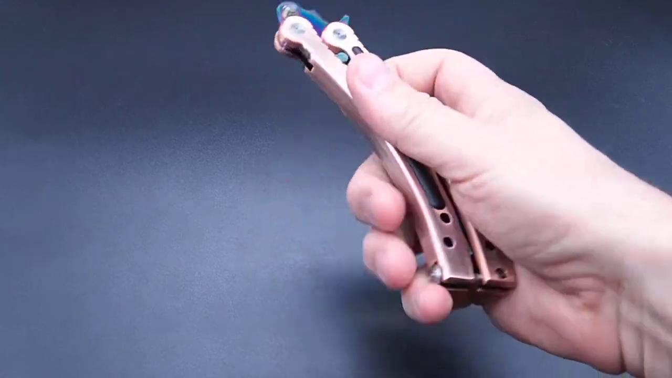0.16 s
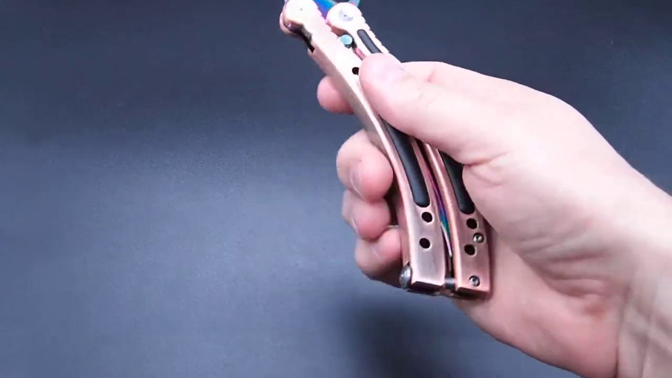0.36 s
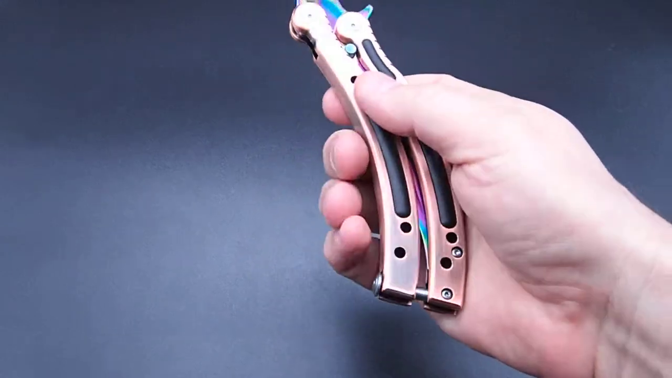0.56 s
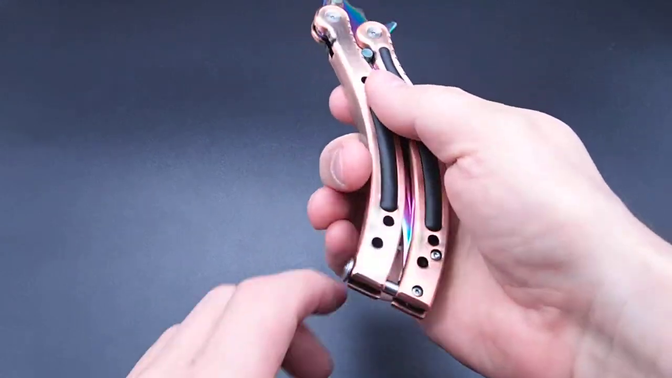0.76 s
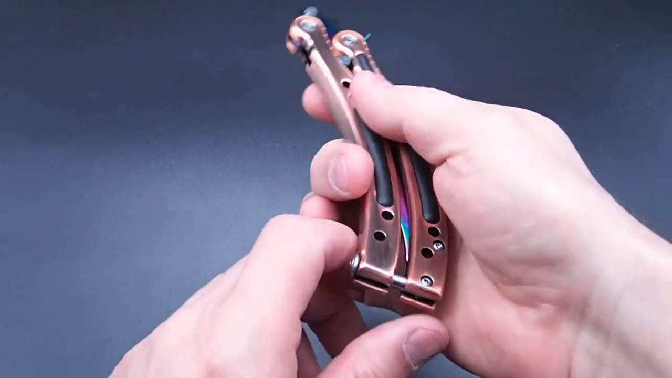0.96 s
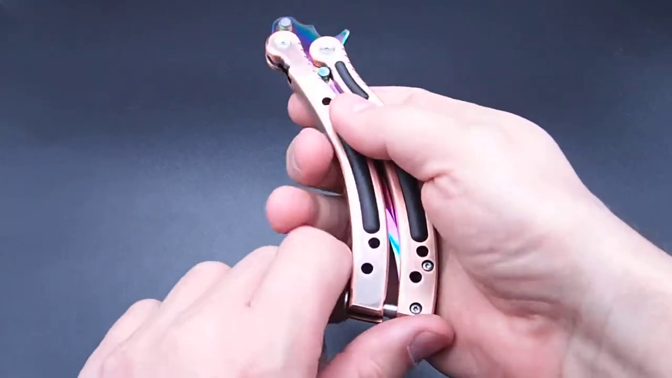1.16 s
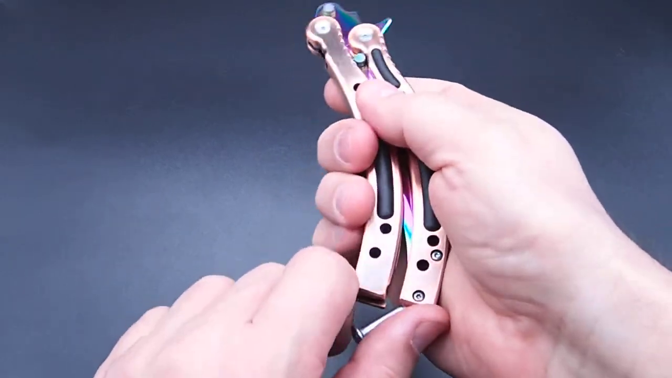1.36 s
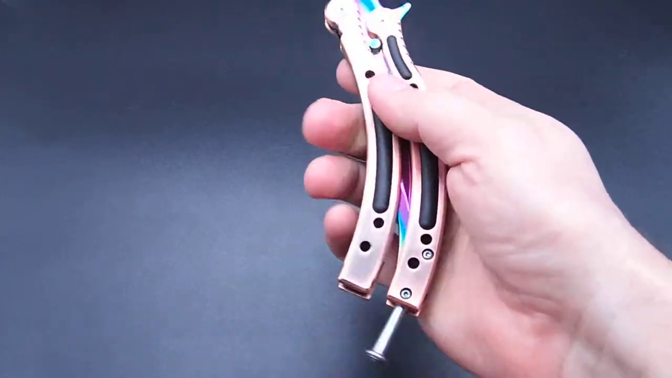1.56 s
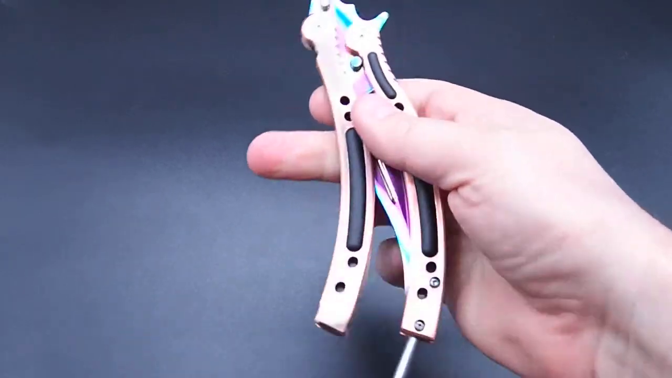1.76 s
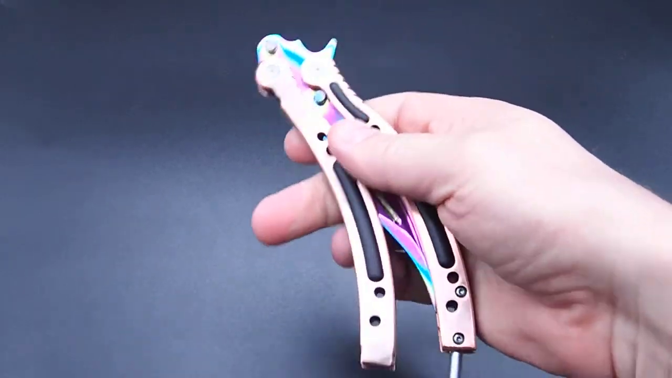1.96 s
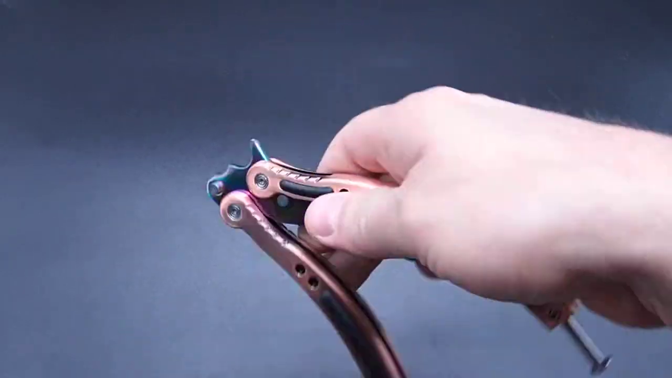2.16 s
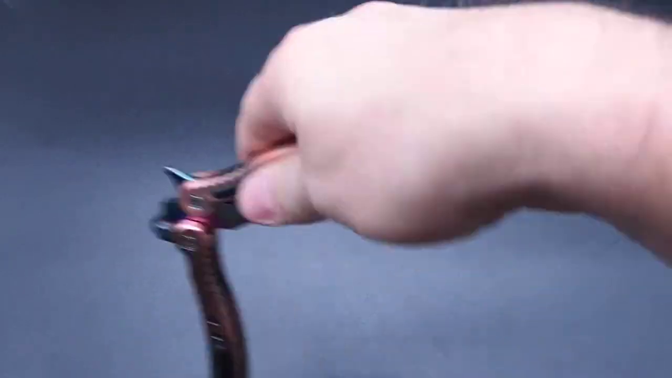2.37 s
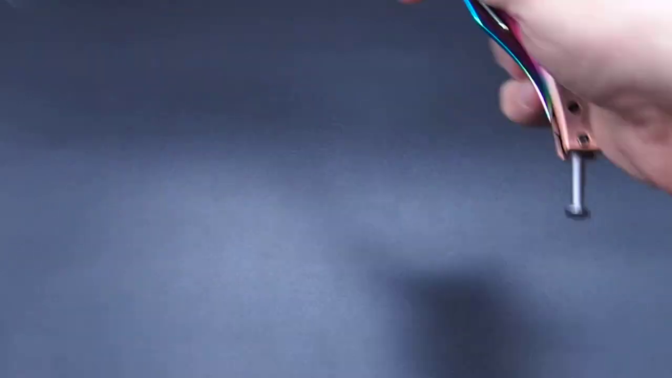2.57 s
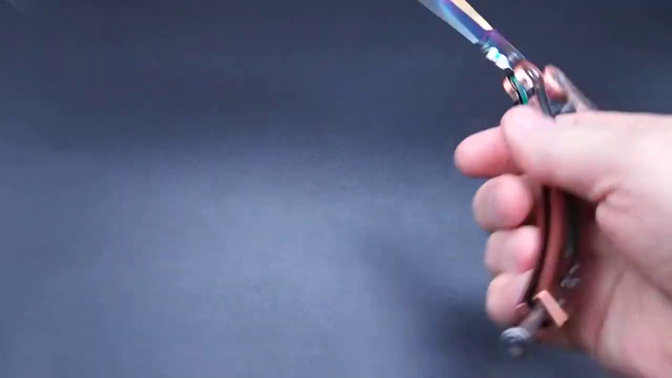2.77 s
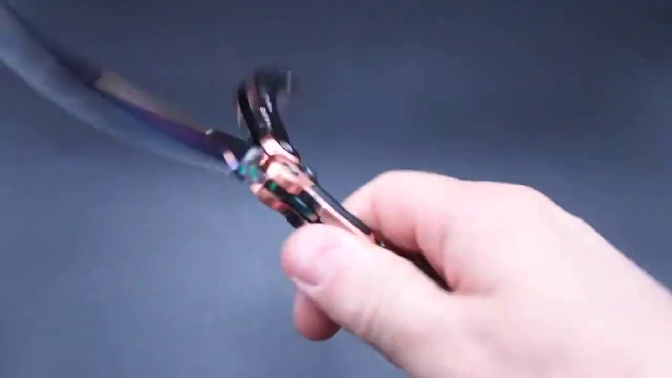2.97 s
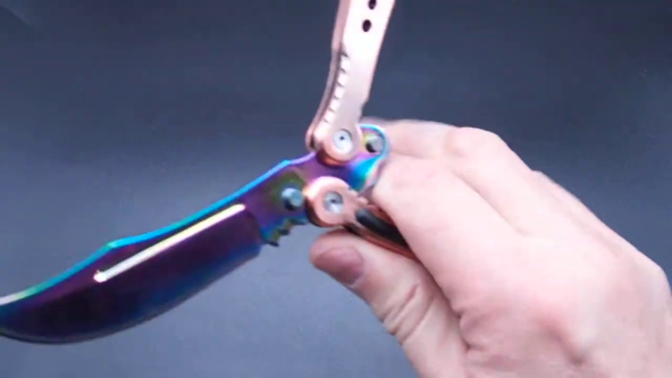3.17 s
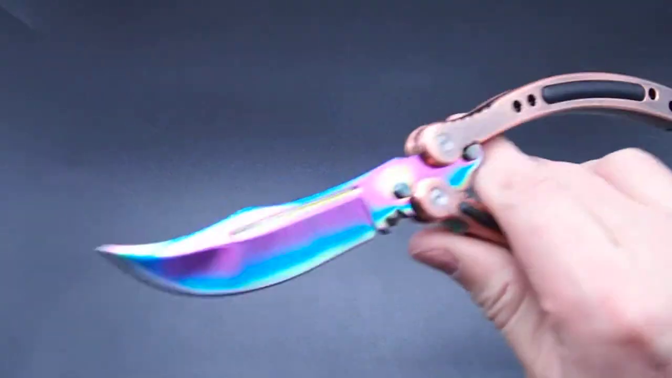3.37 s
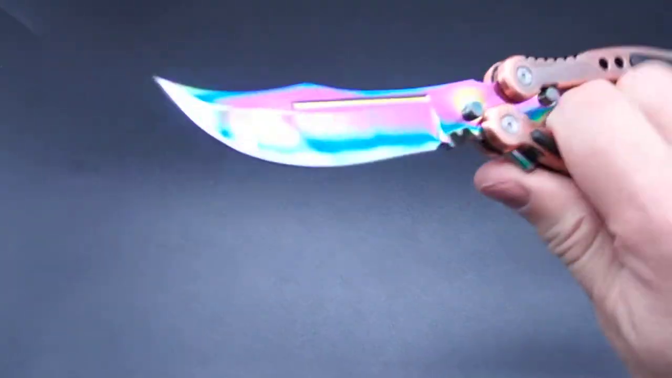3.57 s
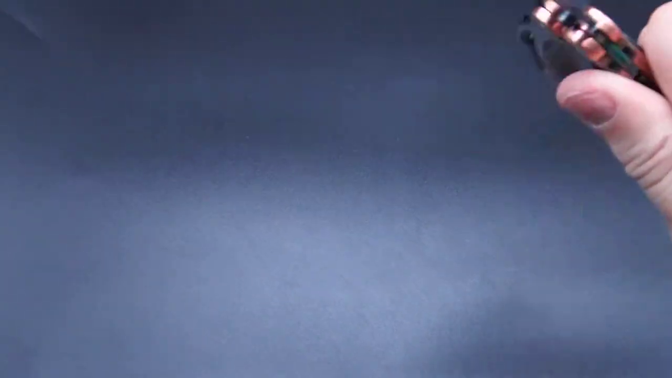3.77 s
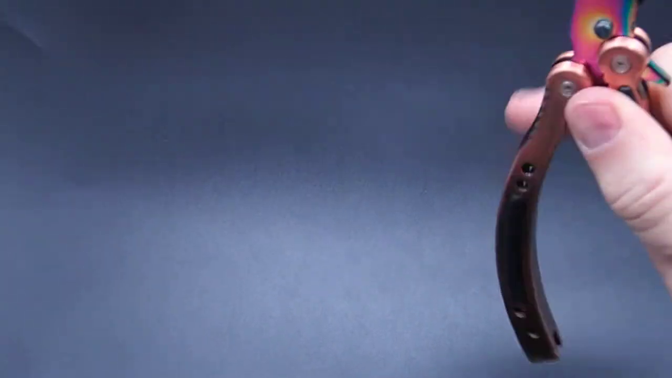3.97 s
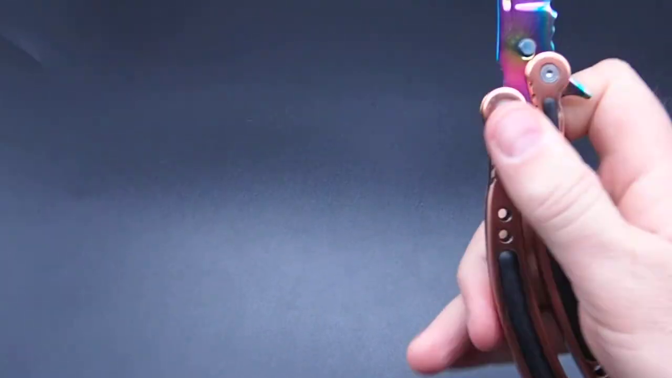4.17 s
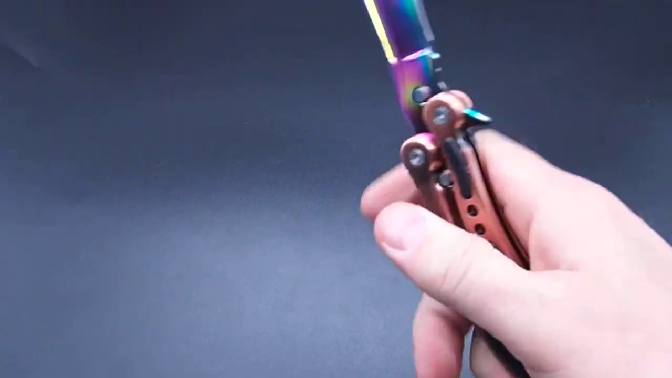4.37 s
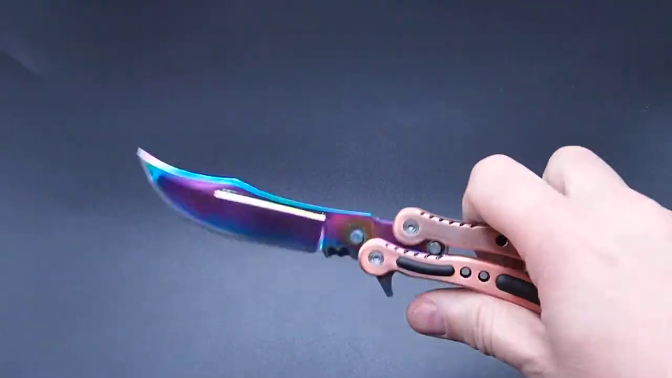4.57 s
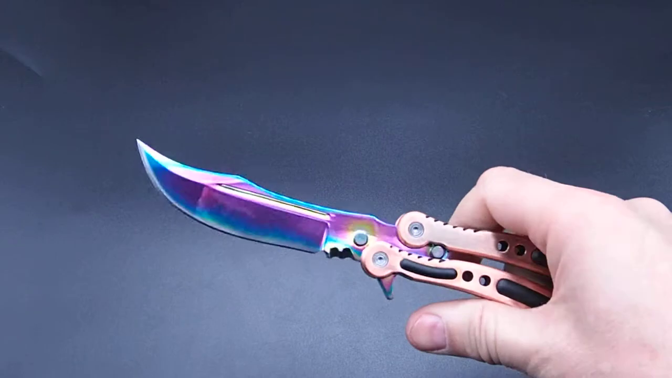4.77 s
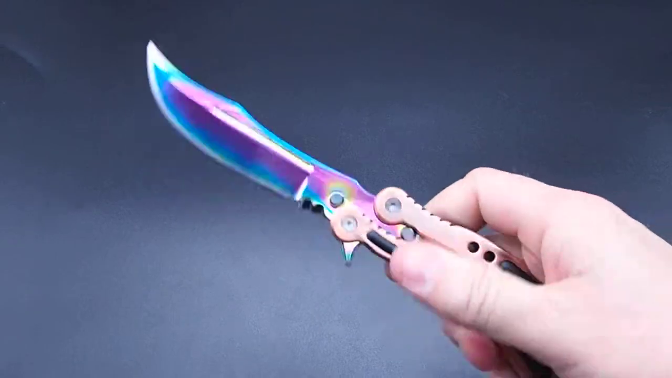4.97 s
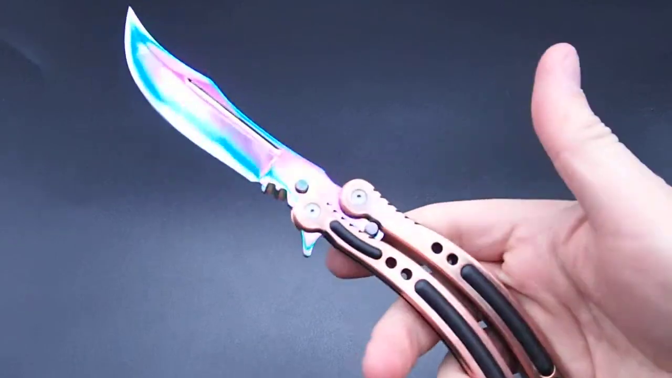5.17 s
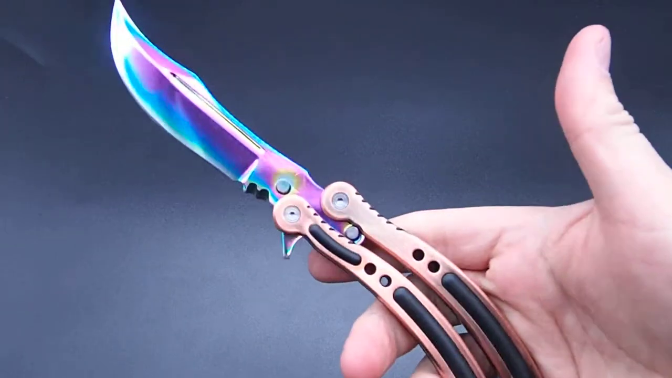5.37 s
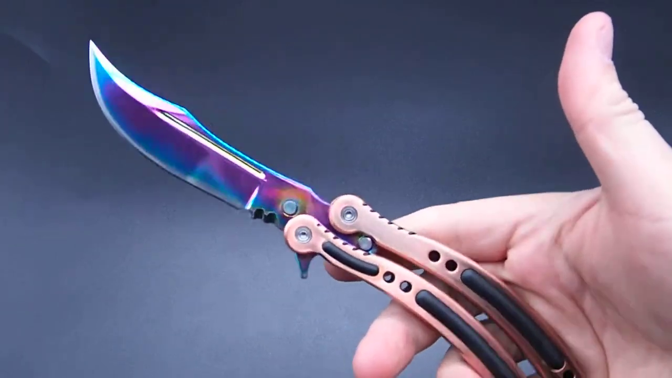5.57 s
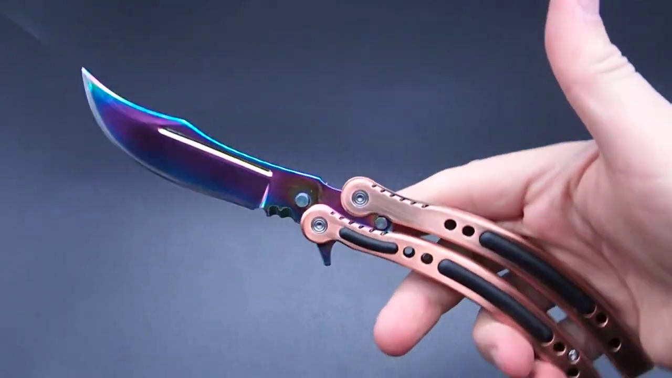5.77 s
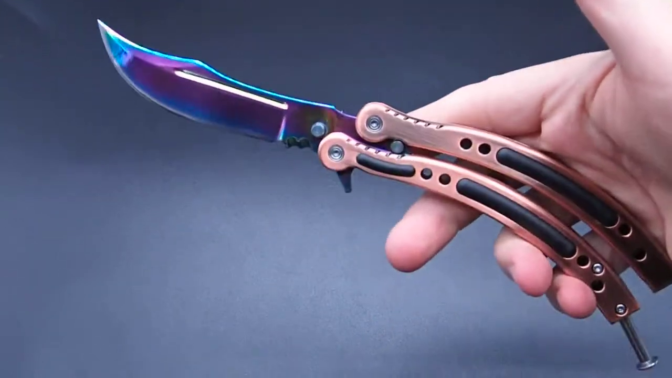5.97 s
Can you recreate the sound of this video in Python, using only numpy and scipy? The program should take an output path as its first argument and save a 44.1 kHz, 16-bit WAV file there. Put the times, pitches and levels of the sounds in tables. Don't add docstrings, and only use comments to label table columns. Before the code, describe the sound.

A steady soft hiss from a small camera microphone fills a quiet, dry room, with tiny thin high focus-motor blips scattered from about 0.8 s. At first there is only a faint tick and a grainy finger rub swelling around 0.7 s. At 1.33 s a sharp metallic clack, then small ticks and a duller clack at 1.56 s, with light rattling to 1.75 s. At 2.27 s a bright slam comes with a low desk knock, followed by a quick skidding rattle at 2.33 s. The loudest ringing clack lands at 2.6 s, a softer one at 2.77 s, another loud bright one at 3.3 s and a weak one at 3.47 s. Two slams almost merge at 4.13-4.16 s. A dull click at 4.47 s and faint ticks at 4.8 s follow, then hiss and a gentle skin rub near 5.9 s.

```python
import sys
import numpy as np
from scipy import signal
from scipy.fft import rfft, irfft, next_fast_len
from scipy.io import wavfile
from scipy.ndimage import uniform_filter1d, map_coordinates

SR = 44100
rng = np.random.default_rng(int(sys.argv[2]) if len(sys.argv) > 2 else 0)


def inscribe(sig):
    pcm = np.round(np.clip(np.atleast_2d(sig).T, -1, 1) * 32767)
    wavfile.write(sys.argv[1], SR, pcm.astype(np.int16))


def to_linear_factor(level_db):
    exponent = np.asarray(level_db, float) / 20
    return 10 ** exponent


N = 265923
SPAN = 8192
TOP_HZ = 15750

# [Hz, dB]
HISS_SPECTRUM = [(20, -18), (60, -11), (130, -5.5), (400, -3.5), (1500, -7.5), (1870, -17), (2100, -13.5),
                 (2650, -22), (3100, -18.5), (4200, -24.5), (4750, -12), (8100, -9), (9500, -15.5),
                 (15600, -15.5)]
# [Hz, 1]
HISS_CORRELATION = [(60, 0.37), (180, 0.35), (550, 0.1), (1650, 0.069), (4970, -0.19), (15000, -0.14)]
# [Hz, Hz, dB]
PORT_NOTCHES = [(3430, 50, -11), (3930, 90, -12), (4320, 50, -8), (2600, 60, -5)]
# [Hz, dB]
SKIN_BODY = [(1500, -14.5), (2500, -15), (4100, -10.5), (4700, -3), (5200, 8), (5800, 4), (6800, -1.5),
             (9000, -18), (15000, -70)]
# [Hz, dB]
SKIN_SHEEN = [(6000, 0), (7000, 6), (8000, 17), (9200, 6.5), (12000, 5), (15600, -14), (15750, -90)]
# [s, dB, dB]
GRIP_PATH = [(0, -76.5, 7), (.42, -65, 3), (1.1, -66.5, 0), (1.4, -61, -5), (1.62, -55.5, -7),
             (1.95, -69, 2), (2.05, -53.5, -8), (2.42, -63, -1), (2.7, -56, -5), (3.0, -52, -13),
             (3.24, -56.5, -8), (3.42, -57, -13), (3.8, -63, 0), (4.1, -59.5, -6), (4.5, -59, -5),
             (4.9, -66, -0.5), (5.6, -69.5, 1), (6.03, -81, 0)]
# [s, dB, s, s]
FINGER_SLIDES = [(.07, -53.5, .07, .06), (.72, -45, 0.71, 0.39), (1.32, -50.5, 0.022, .05),
                 (1.47, -47.5, 0.15, 0.074), (1.724, -49.5, 0.076, 0.083), (2.16, -47, 0.033, 0.16),
                 (2.587, -44.5, .08, 0.066), (3.13, -54, 0.064, 0.14), (3.46, -57, .02, 0.039),
                 (3.86, -48.5, 0.04, 0.026), (3.95, -59, 0.073, .03), (4.37, -49, .08, .14),
                 (4.806, -50, 0.019, 0.037), (5.87, -46.5, 0.25, 0.28)]
# [s, dB, Hz, dB, dB]
SLAMS = [
    (1.333, -10.5, 5800, 0.5, 8),
    (1.564, -20, 5350, -16, 6.5),
    (2.2676, -9, 5200, 11, 8),
    (2.5957, -1.5, 5200, -2.5, 6),
    (2.771, -18.5, 5290, 3.5, 8),
    (3.3023, -3, 5380, 7, 6),
    (3.4665, -23, 5900, 4, 6),
    (4.1300, -9.5, 5020, -3, 4.5),
    (4.1586, -6.5, 5200, 3.5, 9),
]
# [s, dB, Hz, dB]
LOOSE_TICKS = [(0.0677, -46, 5570, 4), (1.418, -43, 5460, 4), (1.4421, -35.5, 5240, -3),
               (1.4640, -29.5, 5300, -15), (1.5575, -34, 5360, -12), (1.6003, -30, 6100, -13),
               (1.71, -43, 5000, -4), (1.7195, -37, 5300, 13), (1.7264, -33.5, 6030, 2),
               (1.739, -40, 5900, 5), (2.0107, -44.5, 5740, 10), (2.1499, -48, 5150, 2),
               (2.3265, -33, 5440, 12), (2.332, -23, 5350, 3), (2.338, -25, 5470, 10),
               (2.344, -26, 5200, 5), (3.0285, -41.5, 5200, -2), (3.0427, -43, 5270, 0),
               (3.1169, -30.5, 5130, -3), (3.1264, -49, 5100, -5), (3.1876, -44, 5170, 0),
               (3.674, -44, 5220, 2), (3.8544, -33, 5460, -2), (4.0372, -34, 4900, -3)]
# [s, dB, Hz, dB]
HELD_TICKS = [
    (4.362, -47, 5340, -3),
    (4.3969, -43, 5310, 1),
    (4.4179, -41, 5300, 4),
    (4.4595, -30.5, 5150, -10),
    (4.4725, -22, 5130, -20),
    (4.4795, -42, 5100, -7),
    (4.8019, -40, 5860, 2),
    (4.8099, -43, 5420, 3),
]
# low modes/dB, high modes/dB, crack/dB, first blow over rattle/dB
SLAM, LOOSE, TIGHT = (-25.5, -10.5, -26.5, 19), (-33, -13, -27, 13), (-30, -16, -27, 12)
# [Hz, Hz, dB]
LOW_MODES = [(1300, 2500, -15), (2200, 990, -3), (2600, 490, 0.5), (3020, 130, 0), (3450, 240, 1.5),
             (3840, 730, -3)]
MAIN_MODES = [(4510, 104, -1), (5020, 116, 1.5), (5200, 240, -5.5), (5554, 200, -0.5), (6070, 750, -4.5),
              (5895, 110, 0.5)]
HIGH_MODES = [(6280, 41, 1), (6530, 900, -3.5), (6750, 110, 5.5), (7200, 770, 0.5), (7680, 240, 0.5),
              (7950, 750, -3), (8350, 190, -19), (8920, 120, -8), (9660, 830, -16)]
# [s, dB, Hz, s]
SINGING_MODES = [(.381, -44.5, 7950, .05), (.393, -44, 7950, .04), (1.335, -36.5, 2200, 0.087),
                 (1.336, -39, 2830, 0.079), (1.464, -47.5, 2200, .07), (1.464, -41, 7200, 0.047),
                 (1.565, -47, 3770, 0.051), (1.572, -57, 2970, 0.14), (2.552, -44, 6800, .06),
                 (2.6, -47.5, 2020, 0.27), (1.334, -21, 8930, 0.03), (2.597, -31, 2940, 0.063),
                 (2.597, -40, 3770, .04), (2.597, -41, 1380, 0.038), (2.597, -5.5, 5190, 0.048),
                 (3.304, -35.5, 1270, 0.047), (3.304, -53, 1670, 0.041), (4.16, -46, 815, 0.049),
                 (4.131, -48, 1300, 0.033), (2.772, -37, 2200, 0.035), (2.772, -38, 3500, .03),
                 (2.772, -33, 4750, .04), (3.306, -46.5, 2000, 0.27), (3.312, -20, 8920, 0.057),
                 (3.311, -19.5, 5450, 0.1), (1.564, -42, 9500, .03), (4.132, -37.5, 2600, 0.15),
                 (4.161, -35, 2920, 0.045), (4.472, -50, 2760, 0.047), (4.806, -50.5, 2960, 0.066)]
# [Hz, s]
ROOM_DECAY = [(300, 0.36), (2000, 0.096), (6000, 0.067), (14000, 0.084)]
FOCUS_FRAMES = [23, 28, 33, 48, 54, 57, 71, 72, 75, 80, 109, 110, 117, 118, 149, 150, 159, 164, 167, 171,
                180]
# [s, dB, dB, s]
DESK_KNOCKS = [
    (1.336, -50, 3, 0.05),
    (2.2678, -24, -12, 0.086),
    (2.2758, -24, -14, 0.13),
    (2.326, -37, 6, 0.1),
    (2.336, -41.5, 10.5, 0.055),
    (2.346, -59, -8, 0.043),
]
# [Hz, Hz, dB]
DESK_LOW_MODES = [(55, 40, -10), (140, 70, -6), (255, 45, 0), (460, 60, 1), (780, 90, -10), (950, 90, -14)]
# [Hz, Hz, dB]
DESK_UPPER_MODES = [(870, 300, 6), (1270, 180, 7), (1600, 420, 7)]


def unit(x):
    return x / np.sqrt(np.mean(x ** 2) + 1e-20)


def along(points, hz):
    f, v = np.transpose(points)
    return np.interp(np.log(hz + 1), np.log(f + 1), v)


def balance(tilt_db):
    return to_linear_factor([[tilt_db], [-tilt_db]])


def modes(table, hz, scatter_db):
    response = 0
    for k, (center, width, db) in enumerate(table):
        strength = (-1) ** k * to_linear_factor(db + scatter_db * rng.standard_normal())
        response = response + strength * 1j * hz * width / (center * center - hz * hz + 1j * hz * width)
    return response


def rush(spectrum, alike, spiky_db):
    m = next_fast_len(N + SPAN)
    hz = np.fft.rfftfreq(m, 1 / SR)
    grain = to_linear_factor(spiky_db * unit(uniform_filter1d(rng.standard_normal(m), size=60)))
    turn = np.arccos(np.clip(along(alike, hz), -1, 1)) / 2
    shares = np.array([np.cos(turn), np.sin(turn)])
    white = rfft(grain * rng.standard_normal((2, m)))
    mid, side = irfft(white * to_linear_factor(along(spectrum, hz)) * shares, m)[:, :N]
    return unit(np.array([mid + side, mid - side]))


def rattle(t60, response, spiky_db, blow_db, wide):
    t = np.arange(SPAN) / SR
    impacts = to_linear_factor(spiky_db * unit(uniform_filter1d(rng.standard_normal(SPAN), size=12)))
    decay = to_linear_factor(-60 * t / np.clip(t60, .003, .2))
    force = decay * impacts * rng.standard_normal((2, SPAN))
    force[:, 0] = to_linear_factor(blow_db)
    mid, side = irfft(rfft(force) * response, SPAN)
    return np.array([mid + wide * side, mid - wide * side]) / np.abs(mid).max()


def add(track, s, sound):
    length = sound.shape[1]
    fade = np.clip(np.arange(length)[::-1] / (.3 * length), 0, 1)
    track[:, round(s * SR):][:, :length] += sound * fade


def room(sound, db):
    hz, t, z = signal.stft(rng.standard_normal((2, SPAN)), SR, nperseg=256)
    decay = to_linear_factor(-60 * t / along(ROOM_DECAY, hz)[:, None])
    tail = signal.istft(z * decay, SR, nperseg=256)[1]
    wet = signal.fftconvolve(sound, tail / np.linalg.norm(tail[0]), axes=1)[:, :SPAN - 200]
    return sound + to_linear_factor(db) * np.pad(wet, ((0, 0), (200, 0)))


def hiss():
    hz = np.fft.rfftfreq(N, 1 / SR)
    noise = irfft(rfft(rush(HISS_SPECTRUM, HISS_CORRELATION, spiky_db=0.2)) * (hz < TOP_HZ), N)
    drift = unit(uniform_filter1d(rng.standard_normal(N), size=4000))
    tone = to_linear_factor(-72 + 2.5 * drift) * np.sin(2 * np.pi * 4775 * np.arange(N) / SR)
    return (to_linear_factor(-51.5) * noise + tone) * balance(1.5)


def skin():
    swell_db, slide_bright_db = 28.5, -8
    fidget_db, fidgets_per_s = 2, 10
    t = np.arange(N) / SR
    s, db, bright_db = np.transpose(GRIP_PATH)
    pressure = rng.standard_normal(round(N / SR * fidgets_per_s) + 4)
    fidget = to_linear_factor(fidget_db * map_coordinates(pressure, [t * fidgets_per_s]))
    grip = fidget * to_linear_factor(np.interp(t, s, db))
    slides = np.zeros(N)
    for at, top_db, rise, fall in FINGER_SLIDES:
        slides += to_linear_factor(top_db - swell_db * np.maximum((at - t) / rise, (t - at) / fall))
    body = np.hypot(grip, slides) * rush(SKIN_BODY, [(3000, 1.0), (7000, 0.6)], spiky_db=-1.0)
    shine = np.hypot(grip * to_linear_factor(np.interp(t, s, bright_db)), slides * to_linear_factor(slide_bright_db))
    sheen = shine * rush(SKIN_SHEEN, [(7000, 1.0), (15000, .2)], spiky_db=1.5)
    return (body + sheen) * balance(1.2)


def notched(steady):
    hz = np.fft.rfftfreq(N, 1 / SR)
    loss_db = sum(db * np.exp(-((hz - c) / w) ** 2) for c, w, db in PORT_NOTCHES)
    return irfft(rfft(steady) * to_linear_factor(loss_db), N)


def contacts():
    flight_s, growth, dulling_db = .0045, 1.5, 6.5
    flights = np.cumsum([0] + [flight_s * growth ** k for k in range(3)])
    slams = []
    for s, db, hz, bright_db, loss_db in SLAMS:
        for k, late in enumerate(flights):
            slams.append((s + late, db - loss_db * k, hz, bright_db - dulling_db * k))
    found = []
    for rows, shares, t60 in [(slams, SLAM, .034), (LOOSE_TICKS, LOOSE, .033), (HELD_TICKS, TIGHT, .015)]:
        low_db, high_db, crack_db, blow_db = shares
        for s, db, hz, bright_db in rows:
            found.append((s, db, low_db + 0.26 * bright_db, high_db + 0.51 * bright_db,
                          crack_db + bright_db, blow_db, hz, t60))
    return found


def knife():
    track, hz = np.zeros((2, N + SPAN)), np.fft.rfftfreq(SPAN, 1 / SR)
    bright = (1j * hz / (11000 + 1j * hz)) ** 2
    port = (4150 ** 2 - hz ** 2 + 1j * hz * 300) / (4150 ** 2 - hz ** 2 + 1j * hz * 1000)
    steep = (-hz ** 2 / (4500 ** 2 - hz ** 2 + 1j * hz * 2500)) ** 2
    for s, db, low_db, high_db, crack_db, blow_db, best_hz, t60 in contacts():
        struck = [(c, w, level - 18 * abs(c - best_hz) / 1000) for c, w, level in MAIN_MODES]
        main = steep * modes(struck, hz, scatter_db=3.0)
        low = to_linear_factor(low_db + 6.5) * modes(LOW_MODES, hz, scatter_db=2.0)
        high = to_linear_factor(high_db) * steep * modes(HIGH_MODES, hz, scatter_db=3.0)
        ring = rattle(t60, (main + low + high) * port, spiky_db=6, blow_db=blow_db, wide=0.18)
        crack = rattle(0.42 * t60, bright * port, spiky_db=1.5, blow_db=-6, wide=0.97)
        clack = room(ring + to_linear_factor(crack_db + 8.5) * crack, db=-8.5)
        add(track, s + .0006, to_linear_factor(db + 1.5) * balance(1.3) * clack)
    t = np.arange(SPAN) / SR
    for s, db, mode_hz, t60 in SINGING_MODES:
        onset = 1 - np.exp(-t / 0.0011)
        ping = to_linear_factor(db - 60 * t / t60) * np.sin(2 * np.pi * mode_hz * t) * onset
        add(track, s, ping * balance(1.2))
    return track[:, :N]


def focus():
    track, t = np.zeros((2, N + SPAN)), np.arange(round(0.027 * SR)) / SR
    gate = np.clip(t / 0.0013, 0, 1)
    for frame in FOCUS_FRAMES:
        phase = 2 * np.pi * rng.random() + np.array([[0], [2.3]])
        whine = np.sin(2 * np.pi * 6163 * t + phase)
        level = to_linear_factor(-47 + 1.5 * rng.standard_normal()) * balance(.8)
        add(track, frame * 1.001 / 30 - .003, level * gate * whine)
    return track[:, :N]


def desk():
    track, hz = np.zeros((2, N + SPAN)), np.fft.rfftfreq(SPAN, 1 / SR)
    for s, db, top_db, t60 in DESK_KNOCKS:
        blow = rattle(t60, modes(DESK_LOW_MODES, hz, scatter_db=.5), spiky_db=2, blow_db=32, wide=.07)
        skid = rattle(t60, modes(DESK_UPPER_MODES, hz, scatter_db=2), spiky_db=3, blow_db=12, wide=.2)
        knock = room(blow + to_linear_factor(top_db - 3) * skid, db=-35)
        add(track, s, to_linear_factor(db + 3.5) * balance(.7) * knock)
    return track[:, :N]


def scene():
    return knife() + desk() + focus() + notched(skin() + hiss())


def band_limit(x):
    return signal.sosfilt(signal.butter(12, 16660, fs=SR, output="sos"), x)


def record(dry):
    power = uniform_filter1d(np.mean(dry ** 2, axis=0), size=90)
    level_db = 10 * np.log10(np.abs(power) + 1e-12)
    ramp_db = 45 * np.arange(N) / SR
    excess_db = np.maximum(level_db + 14.5, 0)
    duck_db = np.maximum.accumulate(excess_db + ramp_db) - ramp_db
    duck_db = uniform_filter1d(np.pad(duck_db, (130, 0))[:N], size=260)
    limited = np.clip(dry * to_linear_factor(-duck_db), -.86, .86)
    hz = np.fft.rfftfreq(N, 1 / SR)
    edge = to_linear_factor(np.interp(hz, [TOP_HZ, TOP_HZ + 250, TOP_HZ + 900], [0, -22, -34]))
    mix = irfft(rfft(limited) * edge, N)
    return band_limit(mix)


dry = scene()
out = record(dry)
inscribe(out)
```